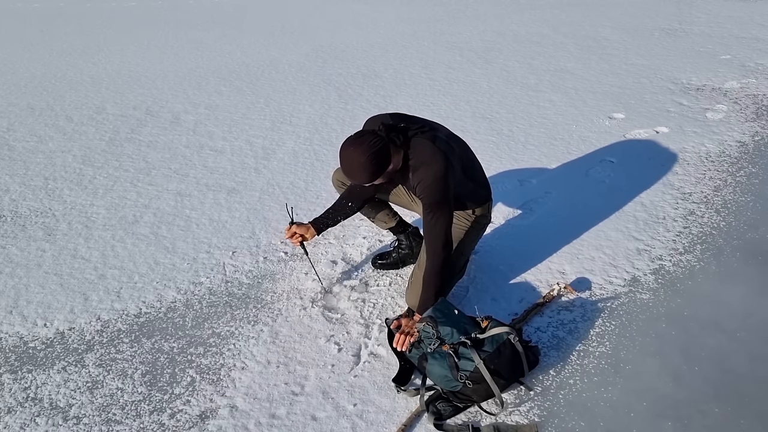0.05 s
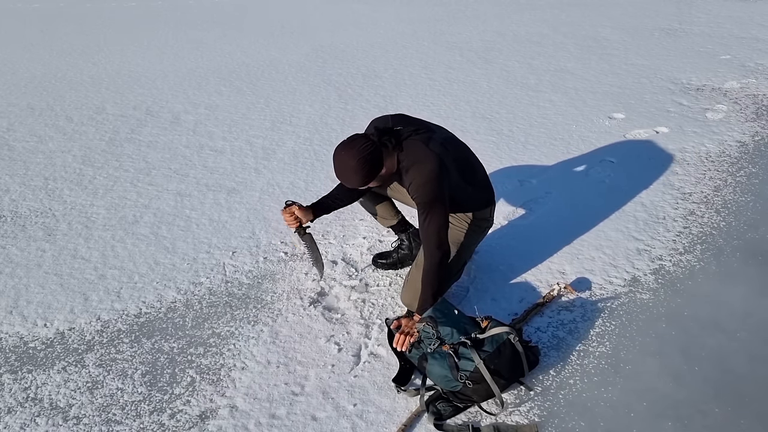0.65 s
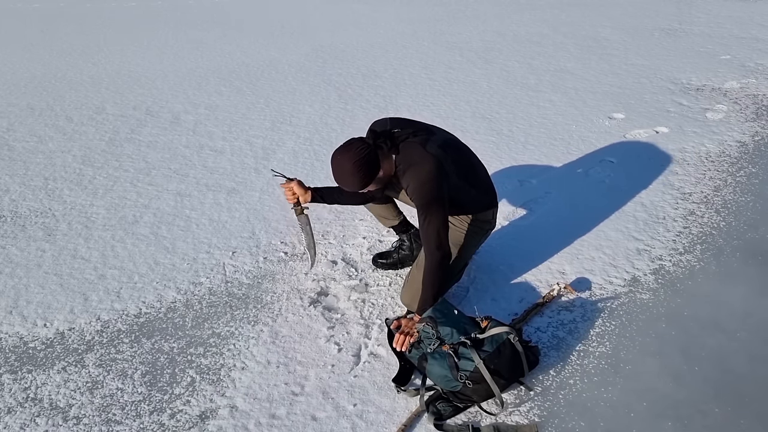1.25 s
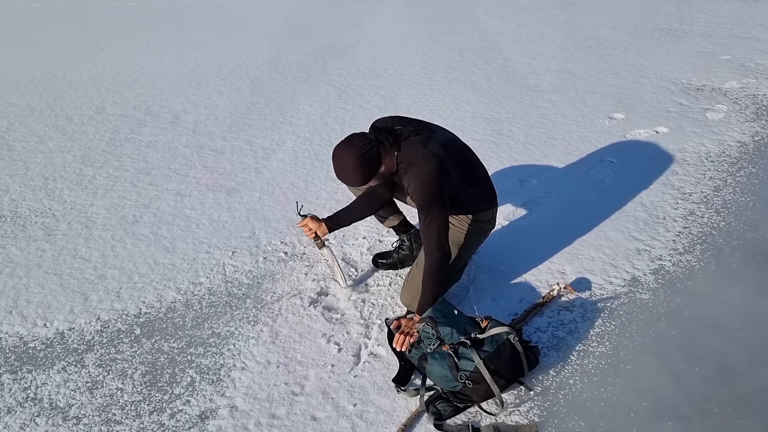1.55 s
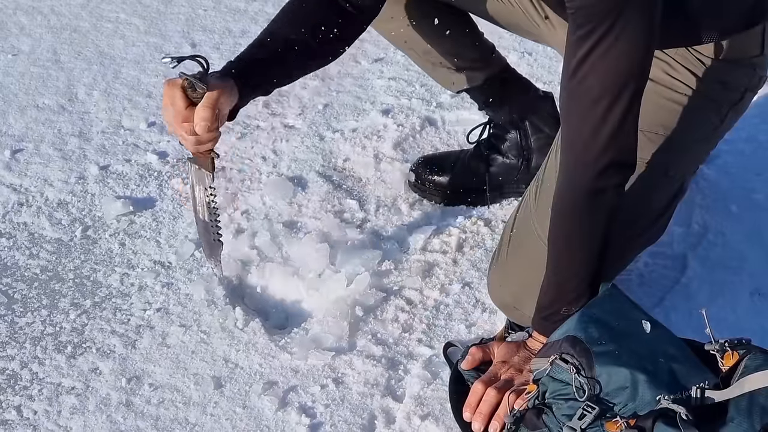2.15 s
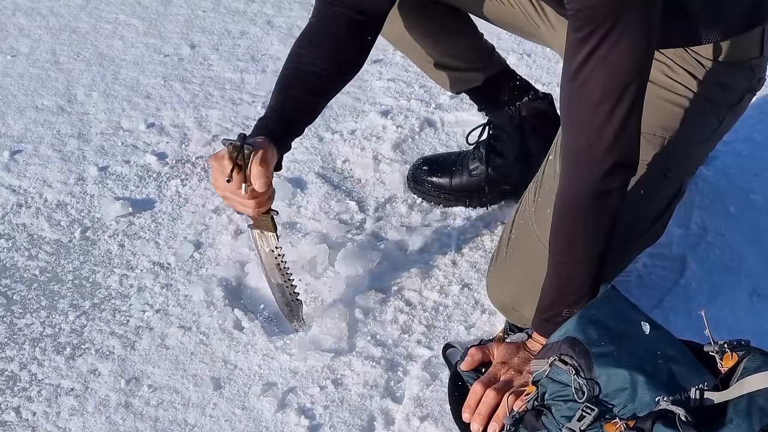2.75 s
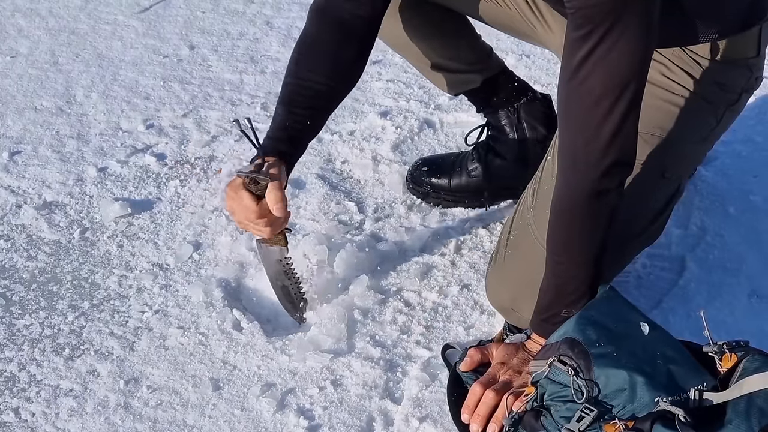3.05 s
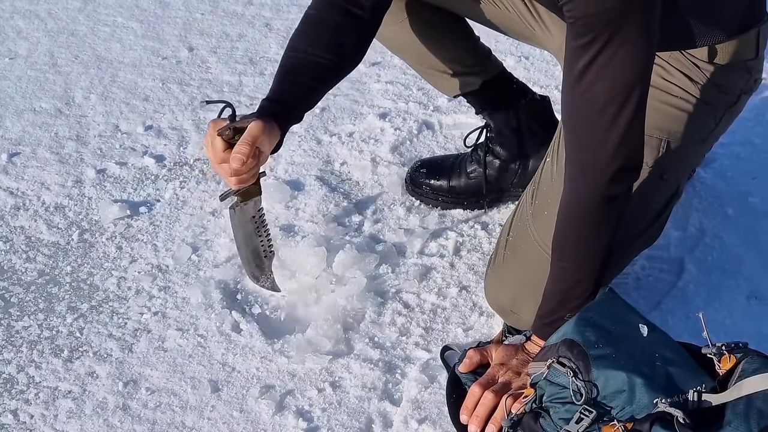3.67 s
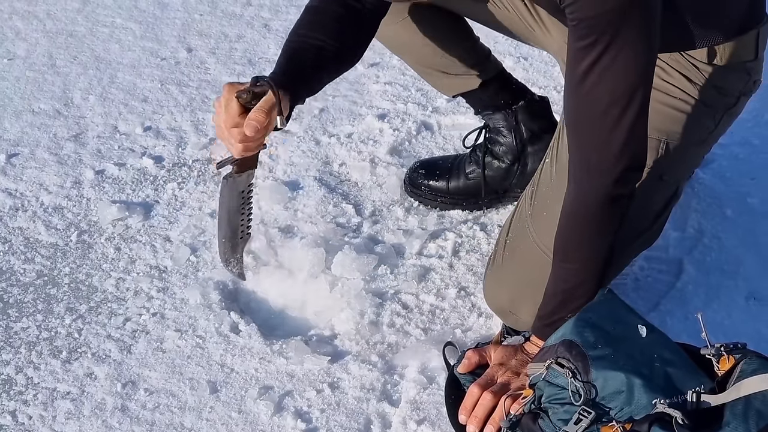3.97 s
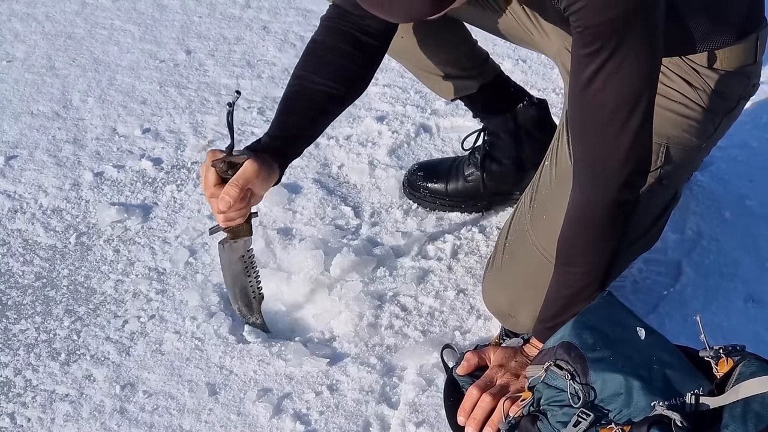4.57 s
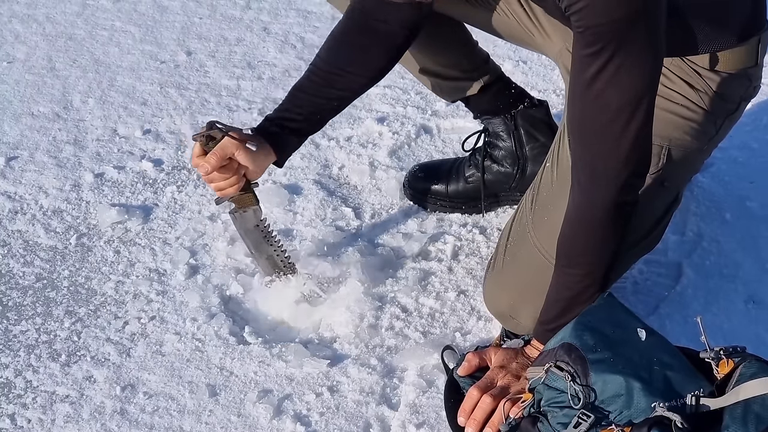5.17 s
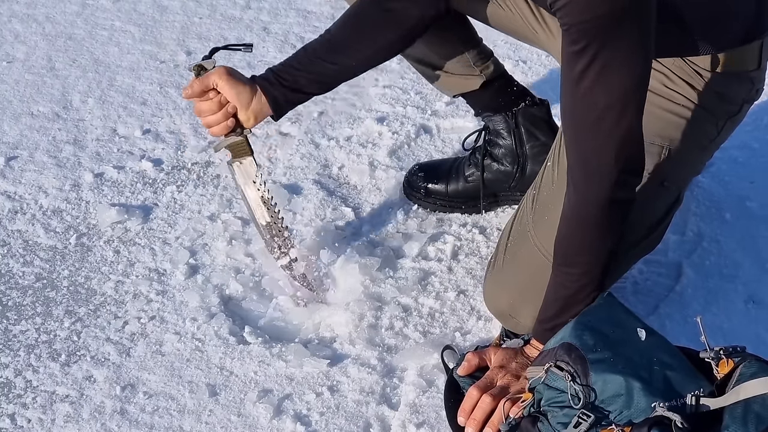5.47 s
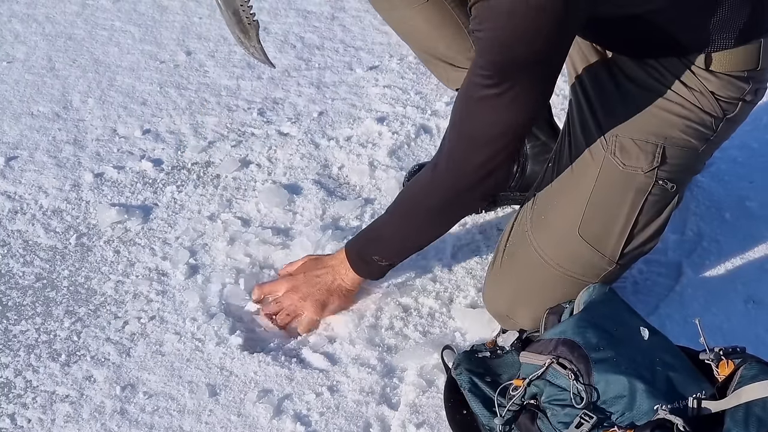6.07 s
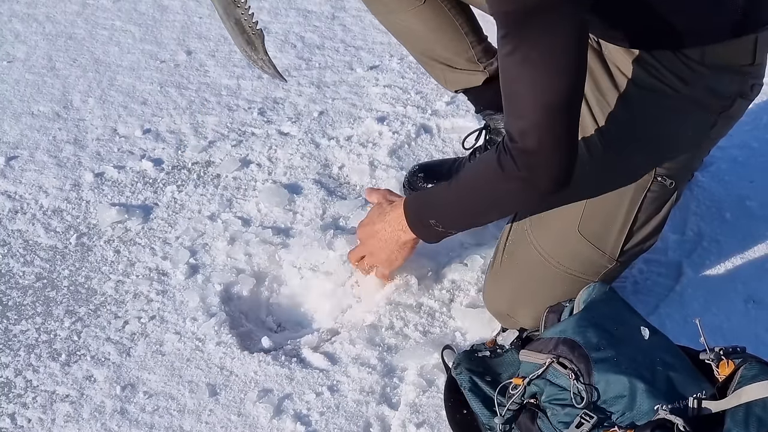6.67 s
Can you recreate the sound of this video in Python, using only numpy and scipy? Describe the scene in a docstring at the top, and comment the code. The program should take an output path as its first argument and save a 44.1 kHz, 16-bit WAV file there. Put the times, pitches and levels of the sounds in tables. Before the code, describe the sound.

Outdoors on lake ice, with faint wind rumbling on the microphone, a big knife chips away in a quick, even rhythm. The crisp crunches and dull knocks start softer and grow louder as they come close, mixed with brief blade scrapes, ticking chips and trickling snow. Then the blows end and a bare hand brushes the crushed ice aside in several rustling strokes.

```python
"""A big knife stabs lake ice about four times a second, first further off, then close by.
Each stab is a crunch of tiny fractures, ending in a knock as the blade jams and a thud as the
ice sheet flexes. The steel rings faintly, the blade scrapes out, chips skitter, snow trickles.
At the end a bare hand sweeps loose ice from the hole. Light wind rumbles on the microphone."""
import sys
import numpy as np
from scipy import signal
from scipy.fft import rfft, irfft, next_fast_len
from scipy.io import wavfile

SR = 44100
rng = np.random.default_rng(int(sys.argv[2]) if len(sys.argv) > 2 else 0)


def pcm_store(signal):
    """Save signal as 16-bit PCM."""
    levels = np.round(np.clip(np.atleast_2d(signal), -1, 1) * 32767)
    wavfile.write(sys.argv[1], SR, levels.astype(np.int16).T)


N = 305172
BURST_SAMPLES = 5120
LEAD_S = .015  # first touch to start of swell

# wind on the microphone: (time [s], level [dB])
WIND_LEVEL = [(0.0, -90.5), (2.7, -65.5), (2.79, -71), (3.45, -70), (4.05, -78.5), (5.24, -71),
              (5.99, -78.5), (6.13, -73.5), (6.92, -75.5)]
# short low rumbles, mostly just after a stab: (time [s], peak [dB])
LOW_THUMPS = [(2.51, -59), (3.005, -54.5), (3.39, -59), (3.83, -53.5), (4.35, -46), (5.375, -53),
              (6.12, -58)]
# open-air hiss: (time [s], level [dB])
HISS_LEVEL = [(0, -78.5), (1.5, -77.5), (2.0, -76.5), (6.92, -76)]
# snow trickling round the hole: (time [s], relative level [dB])
TRICKLE_LEVEL = [(0.0, -73), (0.68, -86), (1.89, -75.5), (2.21, -77.5), (2.37, -69.5), (3.25, -70.5),
                 (3.36, -77), (3.58, -82), (3.75, -64), (4.07, -73.5), (4.64, -80), (4.81, -64),
                 (5.67, -67.5), (5.8, -62.5)]
# blade, sleeve or palm over loose ice: (time [s], length [s], rustle [dB], lumps re rustle [dB])
BRUSH_STROKES = [(0.033, 0.086, -62, -29), (0.46, 0.034, -67, -1), (0.585, 0.041, -70, 2),
                 (2.512, 0.083, -69, 3), (3.097, 0.061, -66.5, -15.5), (5.654, 0.053, -55, -3),
                 (5.723, .03, -52.5, -3), (5.857, 0.036, -52, -23), (5.904, 0.07, -53.5, -41),
                 (5.945, 0.097, -47.5, -3), (6.084, 0.074, -47.5, 0.5), (6.162, 0.1, -49, -15),
                 (6.279, 0.13, -53.5, -12.5), (6.432, 0.072, -45, -12), (6.54, .065, -49.5, -8),
                 (6.597, 0.16, -62, -32), (6.765, 0.18, -55.5, -8), (6.832, .085, -43, -11.5)]
# blade grazing the ice: (time [s], length [s], grit [dB], grit pitch [Hz], crack [dB])
BLADE_SCRAPES = [(0.037, 0.0069, -51.5, 5000, -60), (0.058, .008, -54.5, 4200, -60),
                 (0.218, 0.011, -63.5, 6130, -62), (0.333, 0.0023, -47.5, 5370, -57.5),
                 (0.386, 0.0027, -56, 3260, -52.5), (0.446, 0.027, -56.5, 5600, -52),
                 (0.595, 0.0088, -64, 5050, -54.5), (0.9, .014, -67.5, 4260, -66),
                 (1.58, 0.016, -49.5, 4970, -50.5), (1.699, 0.012, -48.5, 6470, -48.5),
                 (2.012, 0.019, -48, 5100, -49.5), (2.651, 0.0039, -50.5, 3440, -44.5),
                 (2.776, 0.0086, -54.5, 4430, -60), (3.236, 0.0052, -44.5, 4660, -60.5),
                 (3.3, 0.054, -48.5, 4920, -67), (3.612, 0.0098, -31, 6300, -45),
                 (3.627, 0.048, -40.5, 5700, -52.5), (3.818, 0.028, -44.5, 4040, -44),
                 (3.89, 0.0088, -28.5, 6840, -48.5), (3.898, 0.028, -37.5, 5000, -56.5),
                 (4.066, 0.012, -42, 4420, -40), (4.136, 0.0048, -45.5, 5800, -66),
                 (3.797, 0.0044, -22, 7025, -37.5), (4.306, 0.0072, -24, 5600, -50),
                 (4.327, 0.015, -39.5, 4090, -41), (4.381, 0.038, -55, 5030, -69),
                 (4.413, 0.013, -31.5, 4650, -66), (4.583, 0.0028, -38, 5170, -40),
                 (4.672, .02, -41, 4670, -59), (4.813, 0.0047, -42.5, 5500, -45),
                 (4.898, 0.042, -44.5, 4740, -62), (5.198, 0.059, -53, 5870, -64.5),
                 (5.347, 0.0049, -35, 5840, -37.5), (5.618, 0.013, -33.5, 6280, -41.5),
                 (5.65, 0.019, -42.5, 4490, -43), (6.384, 0.011, -41, 3340, -48)]
# single chips snapping or landing: (time [s], level [dB], pitch [Hz])
SINGLE_CHIPS = [(.472, -53, 1840), (.601, -62, 1800), (.8231, -39.5, 11900), (1.754, -43.5, 2930),
                (2.03, -39, 2300), (2.2498, -42, 7630), (2.758, -34, 9300), (2.9441, -37.5, 6100),
                (3.1982, -44.5, 7860), (3.3707, -44, 13740), (3.8402, -33, 5590), (3.949, -47, 7600),
                (4.0836, -36.5, 4600), (4.569, -27.5, 6460), (4.4215, -38, 4600), (4.6184, -38.5, 4770),
                (4.8414, -36.5, 5340), (4.8485, -38, 6150), (5.1227, -26, 11000), (5.178, -43.5, 6500),
                (5.195, -28, 6530), (5.542, -49.5, 8000), (5.5988, -49, 7100), (6.2481, -36.5, 14600),
                (6.5387, -39.5, 5160)]
# loose block nudged: (time [s], knock [dB], knock pitch [Hz], thud [dB])
BLOCK_NUDGES = [(0.119, -76, 610, -67.5), (.336, -57, 1230, -90), (0.717, -55.5, 680, -56),
                (5.004, -55.5, 910, -64), (5.683, -53, 785, -50.5), (6.365, -55, 720, -76)]
# tip breaks in, then jams; one row per catch: (time [s], time to jam [s], grit [dB],
# grit pitch [Hz], crack [dB], knock [dB], knock pitch [Hz], thud [dB], nominal thud pitch [Hz])
KNIFE_STABS = [(.781, .013, -34, 4600, -27.5, -41.5, 1070, -45, 232),
               (1.037, .014, -33.5, 5770, -33.5, -43.5, 800, -40.5, 216),
               (1.291, 0.011, -31.5, 5360, -29, -34, 870, -41.5, 219),
               (1.549, .011, -34.5, 5230, -34, -31, 810, -47, 283),
               (1.714, .006, -37, 5170, -39.5, -44.5, 1010, -44.5, 259),
               (1.794, .007, -40, 5040, -41, -44, 1030, -54, 157),
               (1.942, .014, -26, 5560, -29, -31.5, 1000, -38.5, 239),
               (2.197, 0.0081, -16, 4900, -23.5, -37, 1200, -51, 302),
               (2.21, 0.0099, -21.5, 4720, -21.5, -27, 1170, -32.5, 207),
               (2.453, 0.009, -25, 5860, -31.5, -50, 974, -56.5, 300),
               (2.468, 0.007, -26, 4880, -29.5, -28.5, 900, -36.5, 273),
               (2.708, 0.0083, -18.5, 6380, -23.5, -29, 920, -38.5, 198),
               (2.965, .0075, -16, 4900, -29.5, -26.5, 1090, -30, 252),
               (3.543, .008, -17.5, 6270, -26, -25, 720, -33, 390),
               (3.8, .012, -13.5, 7100, -26, -27, 644, -29, 203.6),
               (4.055, .009, -16.5, 5260, -32, -29.5, 920, -32.5, 270),
               (4.311, 0.01, -17, 5000, -27.5, -37, 659, -31.5, 196.2),
               (4.587, .007, -20.5, 4500, -32.5, -33.5, 840, -30, 244),
               (4.818, .008, -19.5, 5030, -28, -22.5, 792, -33, 372.4),
               (5.079, .002, -17, 6330, -30.5, -53, 1110, -62, 293),
               (5.088, 0.0072, -21, 5330, -29, -30.5, 728, -29, 259),
               (5.355, 0.0073, -25.5, 6800, -24.5, -28, 730, -36, 155),
               (5.631, 0.011, -33.5, 5290, -31, -32.5, 735, -32, 244)]
# steel damped by fist and ice: (frequency [Hz], level [dB], t60 [s])
BLADE_MODES = [(1570, -8.5, 0.016), (2730, -6.5, 0.056), (4500, -2.5, 0.019), (5440, -4.5, 0.017),
               (5940, -2, .045), (6460, -1, 0.036), (7630, -6.5, .05), (7550, -4, 0.04),
               (8150, -6.5, 0.022), (8300, -9.5, 0.043), (9700, -21, 0.12)]
# free blade after a glancing blow: (time [s], level [dB], frequency [Hz], t60 [s])
GLANCE_PING = (5.361, -44, 3320, .1)
# microphone ports: (frequency [Hz], left minus right [dB], left phase lead [rad])
MIC_PORTS = [(100, 2.5, .092), (2000, 2, .11), (3400, 4.5, 0.13), (4360, 0.5, 1.3), (5070, 7.5, 0.98),
             (6160, 4.5, 0.98), (7200, 5, 0.78), (8400, -3.5, 1.2), (10640, -4, 2), (11100, 3, 2.78),
             (13100, -12.5, 1.1), (14200, -8, 2), (15200, -3, 5.6), (16000, 0.5, 6.2)]

# spectra of wind, air and ice: (frequency [Hz], density [dB])
RUMBLE_SPECTRUM = [(15, -2), (40, 1.5), (85, 2), (140, -13), (300, -26.5), (1000, -47)]
AIR_SPECTRUM = [(50, -10.5), (130, -9.5), (270, -3), (550, -3), (1500, -13), (3000, -16.5), (7000, -23.5),
                (11000, -21.5), (14500, -13.5)]
RUSTLE_SPECTRUM = [(1800, -21.5), (3300, -5.5), (4500, 2.5), (7000, 2.5), (9000, -2), (11000, -6),
                   (14000, -2), (16000, -16)]
LUMP_SPECTRUM = [(200, -12.5), (480, -17.5), (700, -5.5), (1000, -5), (1300, 2), (2200, -24), (5000, -47.5)]
CRACK_SPECTRUM = [(500, -14.5), (900, -10.5), (1280, -1), (1460, -11), (1700, 1), (2200, 0), (2700, -1.5),
                  (3300, -7.5), (5000, -22.5)]
GRIT_SPECTRUM = [(2000, -25), (3200, -3), (4800, 2), (6000, -2.5), (7300, -1.5), (8500, -7.5), (10500, -21),
                 (13000, -39.5)]
FIZZ_SPECTRUM = [(6500, -29.5), (9000, 1.5), (11000, -1), (12500, -1), (14000, 4.5), (15300, -5.5),
                 (16500, -20)]
KNOCK_SPECTRUM = [(250, -19), (400, -11.5), (550, -2.5), (700, 6), (900, -6.5), (1250, 1), (1600, -9.5),
                  (3000, -26)]
THUD_SPECTRUM = [(30, -18.5), (60, -13.5), (110, -8), (200, -1.5), (330, -4.5), (460, -20), (900, -36.5)]
CHIP_SPECTRUM = [(300, -7.5), (1500, -11.5), (5000, -6), (9000, -6.5), (15000, -6)]


def from_db(db):
    return 10 ** (np.asarray(db) / 20)


def unit_rms(x):
    return x / np.sqrt(np.mean(x ** 2) + 1e-20)


def at_level(x, db, length_s):
    """Scale a burst to the energy of length_s at this level."""
    return from_db(db) * unit_rms(x) * np.sqrt(length_s * SR / x.shape[-1])


def gain_curve(rows):
    """Per-sample gain from (time [s], level [dB]) rows."""
    return from_db(np.interp(np.arange(N) / SR, *np.transpose(rows)))


def add(out, at_s, sound):
    i = max(0, int(at_s * SR))
    out[:, i:i + sound.shape[-1]] += sound[..., :max(0, N - i)]


def drift(rate_hz, size=N):
    """Interpolated unit-normal random knots."""
    knots = rng.standard_normal(int(size / SR * rate_hz) + 2)
    return np.interp(np.arange(size) / SR * rate_hz, np.arange(len(knots)), knots)


def colour(x, spectrum, peak_hz=1000, peak_db=0, width_oct=.3):
    """Minimum-phase filter: a spectrum plus one broad resonance."""
    size = 2 * next_fast_len(x.shape[-1] // 2 + 1)
    pitch_oct = np.log2(np.maximum(np.fft.rfftfreq(size, 1 / SR), 20))
    hz, db = np.transpose(spectrum)
    outside_oct = np.abs(pitch_oct - np.clip(pitch_oct, np.log2(hz[0]), np.log2(hz[-1])))
    db = np.interp(pitch_oct, np.log2(hz), db) - 20 * outside_oct
    db += peak_db / (1 + ((pitch_oct - np.log2(peak_hz)) / width_oct) ** 2)
    cepstrum = irfft(np.log(from_db(db)))[:size // 2]
    cepstrum[1:] *= 1 + np.cos(np.linspace(0, np.pi, size // 2 - 1))  # taper keeps the pulse short
    return irfft(rfft(x, size) * np.exp(rfft(cepstrum, size)))[..., :x.shape[-1]]


def wind_and_thumps(thump_half_width_s=.03):
    """Steady wind on the microphone; over it short low rumbles, mostly just after a stab."""
    t = np.arange(N) / SR
    thumps = sum(from_db(db) * np.exp(-((t - at_s) / thump_half_width_s) ** 2)
                 for at_s, db in LOW_THUMPS)
    noise = rng.standard_normal(N) + .97 * rng.standard_normal((2, N))
    return (gain_curve(WIND_LEVEL) + thumps) * unit_rms(colour(noise, RUMBLE_SPECTRUM))


def open_air():
    """Faint broadband hiss."""
    noise = rng.standard_normal(N) + .66 * rng.standard_normal((2, N))
    return gain_curve(HISS_LEVEL) * unit_rms(colour(noise, AIR_SPECTRUM))


def fractures(per_s, spread_db, size=BURST_SAMPLES, pan_db=4):
    """Tiny breaks at random times and spots: many small, few large."""
    chance, kind = rng.random((2, size))
    at = np.flatnonzero(chance < per_s / SR)
    strength = np.minimum(-np.log(chance[at] * SR / per_s + 1e-9), 4)
    side_db = pan_db * np.cos(2 * np.pi * kind[at])
    clicks = np.zeros((2, size))
    clicks[:, at] = np.sign(kind[at] - .5) * from_db(spread_db * strength + [side_db, -side_db])
    return clicks


def crystals(bands=26, patch_db=3.8, clump_db=2.2):
    """Crystals rub and tumble in clumps; each size comes and goes in its own band."""
    out, edges_hz = 0, np.geomspace(420, 16000, bands + 1)
    swarms = [fractures(per_s=3200, spread_db=4.4, size=N) + 1e-18 for _ in range(2)]
    for k, band_hz in enumerate(zip(edges_hz, edges_hz[1:])):
        bandpass = signal.butter(2, band_hz, "band", fs=SR, output="sos")
        out += from_db(patch_db * drift(45)) * signal.sosfilt(bandpass, swarms[k % 2])
    return out * from_db(clump_db * drift(130))


def loose_ice(moves):
    """Snow rustles, crumbs crackle, lumps crunch low. Moves: (envelope, lumps re rustle [dB])."""
    out, grains = 0, crystals()
    layers = [(RUSTLE_SPECTRUM, 0, 0), (CRACK_SPECTRUM, .41, -1.8), (LUMP_SPECTRUM, 1, 0)]
    for spectrum, lump_share, trim_db in layers:
        gain = sum(envelope * from_db(lump_share * lumps_db + trim_db) for envelope, lumps_db in moves)
        out += gain * unit_rms(colour(grains, spectrum))
    return out


def showers():
    """Crumbs thrown up by each stab, stronger with its grit: (time [s], level [dB])."""
    return [(at_s + length_s, -56.5 + .49 * grit_db) for at_s, length_s, grit_db, *_ in KNIFE_STABS]


def crumbs(shower_peak_s=.032, lumps_db=-12):
    """Snow trickles unevenly; each stab's shower swells and dies away."""
    t = np.arange(N) / SR
    power = (gain_curve(TRICKLE_LEVEL) * from_db(-1.5)) ** 2
    for at_s, db in showers():
        age = np.clip((t - at_s) / shower_peak_s, 0, 20)
        power += (from_db(db) * age * np.exp(1 - age)) ** 2
    flicker = from_db(3.7 * drift(110) - 2)
    return loose_ice([(np.sqrt(power) * flicker, lumps_db)])


def brushes(attack_s=.01, release_s=.016):
    """Blade, sleeve or palm pushes loose ice, catching as it slides."""
    t, moves = np.arange(N) / SR, []
    catching = from_db(2.2 * drift(70) - .5)
    for at_s, length_s, db, lumps_db in BRUSH_STROKES:
        attack = np.clip((t - at_s) / attack_s, 0, 1)
        release = np.exp(-np.clip((t - at_s - length_s) / release_s, 0, 20))
        moves.append((from_db(db) * attack * release * catching, lumps_db))
    return loose_ice(moves)


def stroke(length_s, rise_s, fall_s, tail_db, tail_s, touch_db=-28, touch_s=.003):
    """Contact force: light touch, swell from LEAD_S, hold, release, settling tail."""
    t = np.arange(BURST_SAMPLES) / SR - LEAD_S
    after_s = np.maximum(t - length_s, 0)
    touch = from_db(touch_db) * np.exp(np.minimum(t, 0) / touch_s)
    swell = np.maximum(np.clip(t / rise_s, 0, 1) ** 2, touch)
    return swell * (np.exp(-after_s / fall_s) + from_db(tail_db) * np.exp(-after_s / tail_s))


def shard(x, spectrum, peak_hz, peak_db, ripple_db, ring_s, taps=1024):
    """A piece of ice: one main resonance, random lesser ones, all quickly damped."""
    hz, db = np.transpose(spectrum)
    grid_hz = np.geomspace(hz[0], hz[-1], 30)
    own_db = np.interp(np.log(grid_hz), np.log(hz), db) + ripple_db * rng.standard_normal(len(grid_hz))
    own_spectrum = np.transpose([grid_hz, own_db])
    response = colour(signal.unit_impulse(taps), own_spectrum, peak_hz, peak_db, width_oct=.28)
    response *= np.exp(-(np.arange(taps) / SR / ring_s) ** 2)
    size = BURST_SAMPLES + taps
    return irfft(rfft(x, size) * rfft(response, size))[..., :BURST_SAMPLES]


def crunch(row, force, per_s, spread_db, ripple_db, peak_db, crack_lag_s, grit_share, fizz_trim_db):
    """Fracture swarm: grit from two splinters and fizz first, coarser cracks as the steel sinks in."""
    length_s, grit_db, grit_hz, crack_db = row
    splinters = [force * fractures(per_s / 2, spread_db) for _ in range(2)]
    grit = sum(shard(clicks, GRIT_SPECTRUM, grit_hz * 2 ** detune_oct, peak_db, ripple_db, ring_s=.005)
               for clicks, detune_oct in zip(splinters, (-.15, .15)))
    fizz = colour(force * fractures(2 * per_s, spread_db), FIZZ_SPECTRUM)
    crack = shard(force * fractures(per_s, spread_db), CRACK_SPECTRUM,
                  peak_hz=3600, peak_db=.79, ripple_db=1.4 * ripple_db, ring_s=.0024)
    crack = np.roll(crack, int(crack_lag_s * SR), axis=-1)
    fizz_db = crack_db + grit_share * (grit_db - crack_db) + fizz_trim_db
    layers = [(grit, grit_db), (fizz, fizz_db), (crack, crack_db)]
    return sum(at_level(sound, db, length_s) for sound, db in layers)


def scrapes(trim_db=-2.4):
    """The blade grazes the ice going in or out: sparse, uneven fractures."""
    out = np.zeros((2, N))
    for at_s, *row in BLADE_SCRAPES:
        length_s = row[0]
        force = stroke(length_s, rise_s=.00088 + .2 * length_s, fall_s=.0025,
                       tail_db=-20, tail_s=.012, touch_db=-25.5)
        scrape = crunch(row, force, per_s=1500, spread_db=6, ripple_db=7, peak_db=9,
                        crack_lag_s=.00022, grit_share=.28, fizz_trim_db=-3.5)
        add(out, at_s - LEAD_S - .001, from_db(trim_db) * scrape)
    return out


def chips(strays_per_stab=3, max_flight_s=.16, pops_per_brush=3):
    """Short pitched snaps: single chips, strays landing after stabs, lumps popping under brushes."""
    out = np.zeros((2, N))
    strays = [(at_s + max_flight_s * flight, db - 1 + 9 * weight, 3500 * 2 ** (1.3 * pitch))
              for at_s, db in showers()
              for flight, weight, pitch in rng.random((strays_per_stab, 3))]
    pops = [(at_s + length_s * when, db - 2.5 + 8 * weight, 1500 * 2 ** (2.1 * pitch))
            for at_s, length_s, db, _ in BRUSH_STROKES
            for when, weight, pitch in rng.random((pops_per_brush, 3))]
    force = stroke(.00021, rise_s=.00015, fall_s=.0016, tail_db=-20, tail_s=.0039,
                   touch_db=-18.5, touch_s=.0012)
    for at_s, db, hz in list(SINGLE_CHIPS) + strays + pops:
        clicks = force * fractures(per_s=24000, spread_db=2.5)
        snap = shard(clicks, CHIP_SPECTRUM, hz, peak_db=9, ripple_db=.5, ring_s=.0063)
        add(out, at_s - LEAD_S, at_level(snap, db, .0017))
    return out


def knocks(block_hz=287, jam_lead_s=.0058, thud_lag_s=.0043):
    """The blade jams or a block is nudged: a woody knock, then the slower, lower flex of the ice."""
    out, t = np.zeros((2, N)), np.arange(BURST_SAMPLES) / SR
    jam = stroke(.0078, rise_s=.0055, fall_s=.003, tail_db=-34.5, tail_s=.02, touch_db=-20.5)
    shake = stroke(.006, rise_s=.004, fall_s=.0055, tail_db=-27, tail_s=.016, touch_db=-12, touch_s=.005)
    sway = stroke(.006, rise_s=.004, fall_s=.011, tail_db=-20, tail_s=.025)
    flex_envelope = (t / .0022) ** 2 * np.exp(-t / .002)
    blows = [(at_s + length_s, *row[3:]) for at_s, length_s, *row in KNIFE_STABS]
    blows += [(*row, block_hz) for row in BLOCK_NUDGES]
    for at_s, knock_db, knock_hz, thud_db, thud_hz in blows:
        clicks = jam * fractures(per_s=8800, spread_db=7.5)
        knock = shard(clicks, KNOCK_SPECTRUM, knock_hz, peak_db=6.5, ripple_db=4, ring_s=.0043)
        add(out, at_s - LEAD_S - jam_lead_s, at_level(knock, knock_db + .18, .01))
        flex_hz = thud_hz * (.7 + .55 * np.exp(-t / .009))  # low bending waves arrive last
        flex = flex_envelope * np.sin(2 * np.pi * np.cumsum(flex_hz) / SR + rng.uniform(0, 2 * np.pi))
        shudder = colour(shake * rng.standard_normal(BURST_SAMPLES), THUD_SPECTRUM)
        heave = colour(sway * rng.standard_normal(BURST_SAMPLES), RUMBLE_SPECTRUM)
        thud_s = at_s + thud_lag_s
        add(out, thud_s - .0045, at_level(flex, thud_db, .0042))
        add(out, thud_s - LEAD_S - .006, at_level(shudder, thud_db - 1.5, .0084))
        add(out, thud_s - LEAD_S - .004, at_level(heave, thud_db - 23, .0046))
    return out


def bites(slip_db=2, slips_per_s=400):
    """The tip sticks and slips through the crust: hard, dense fractures."""
    out = np.zeros((2, N))
    for at_s, *row in KNIFE_STABS:
        force = stroke(row[0], rise_s=.0018, fall_s=.0035, tail_db=-28, tail_s=.019,
                       touch_db=-23, touch_s=.0023)
        force *= from_db(slip_db * drift(slips_per_s, BURST_SAMPLES))
        bite = crunch(row[:4], force, per_s=14000, spread_db=2.5, ripple_db=5, peak_db=14,
                      crack_lag_s=.0011, grit_share=.2, fizz_trim_db=-6.5)
        add(out, at_s - LEAD_S - .001, bite)
    return out


def blade_ring(re_grit_db=-12, spread_db=1, attack_s=.001):
    """Each bite rings the steel briefly; one glancing blow makes it ping."""
    out, t = np.zeros((2, N)), np.arange(BURST_SAMPLES) / SR
    hz, db, t60_s = np.transpose(BLADE_MODES)[:, :, None]
    attack = np.minimum(t / attack_s, 1)
    for at_s, length_s, grit_db, *_ in KNIFE_STABS:
        strength, phase = rng.standard_normal((2, len(BLADE_MODES), 1))
        decay = from_db(db + spread_db * strength - 60 * t / t60_s)
        modes = decay * np.sin(2 * np.pi * (hz * t + phase))
        add(out, at_s + length_s / 2, from_db(grit_db + re_grit_db) * attack * modes.sum(0))
    at_s, db, hz, t60_s = GLANCE_PING
    add(out, at_s, from_db(db - 60 * t / t60_s) * np.sin(2 * np.pi * hz * t))
    return out


def microphone(x):
    """The two ports shade and delay the sound differently."""
    size = 2 * next_fast_len(N // 2 + BURST_SAMPLES)
    hz, balance_db, lead_rad = np.transpose(MIC_PORTS)
    bins_hz = np.fft.rfftfreq(size, 1 / SR)
    left_gain = from_db(np.interp(bins_hz, hz, balance_db) / 2)
    left = left_gain * np.exp(.5j * np.interp(bins_hz, hz, lead_rad))
    ports = np.array([left, 1 / left]) / np.sqrt((left_gain ** 2 + left_gain ** -2) / 2)
    return irfft(rfft(x, size) * ports)[:, :N]


def scene():
    """Knife and ice through the ports, over wind, low thumps and air."""
    knife_and_ice = bites() + scrapes() + blade_ring() + knocks() + chips() + crumbs() + brushes()
    return microphone(knife_and_ice) + wind_and_thumps() + open_air()


def record(dry):
    """Hard clip, then steep low-pass."""
    ceiling, cutoff_hz = .85, 16100
    lowpass = signal.ellip(10, .1, 70, cutoff_hz, fs=SR, output="sos")
    return signal.sosfilt(lowpass, np.clip(dry, -ceiling, ceiling))


dry = scene()
out = record(dry)
pcm_store(out)
```